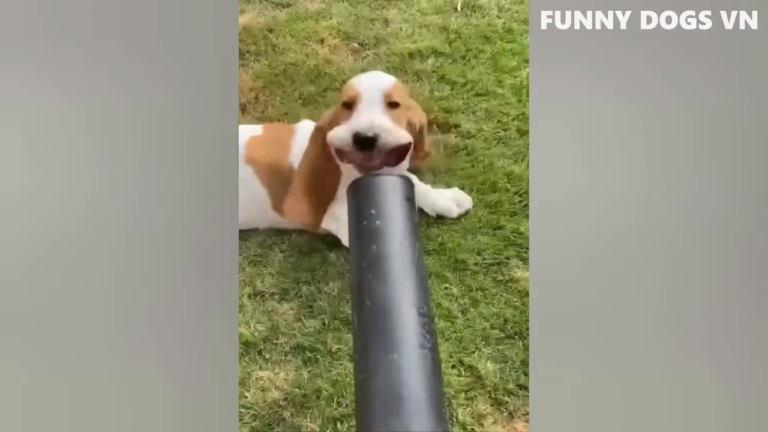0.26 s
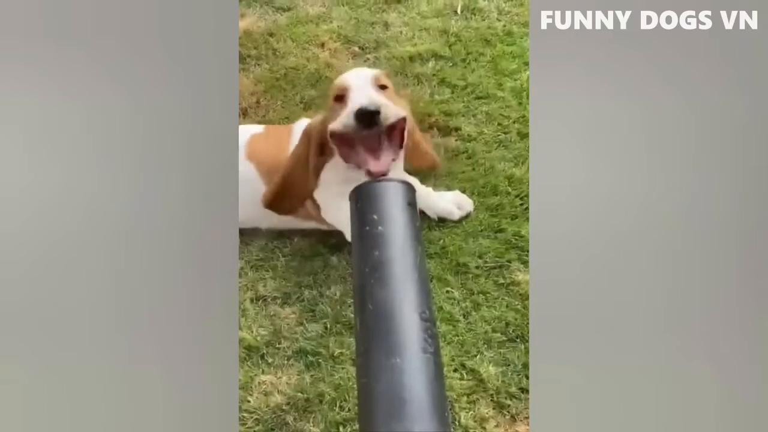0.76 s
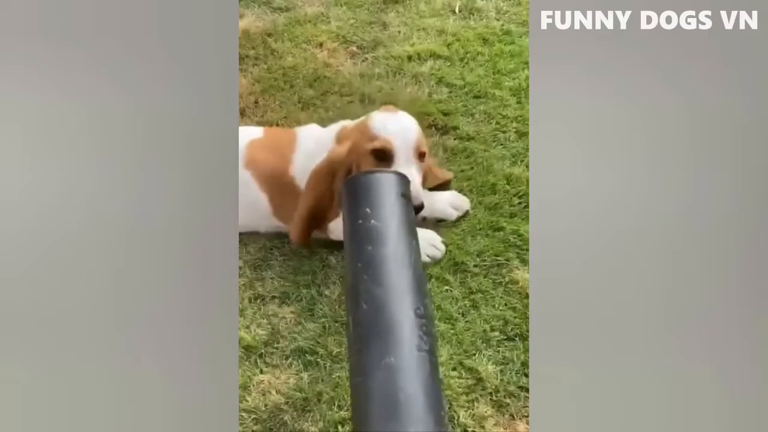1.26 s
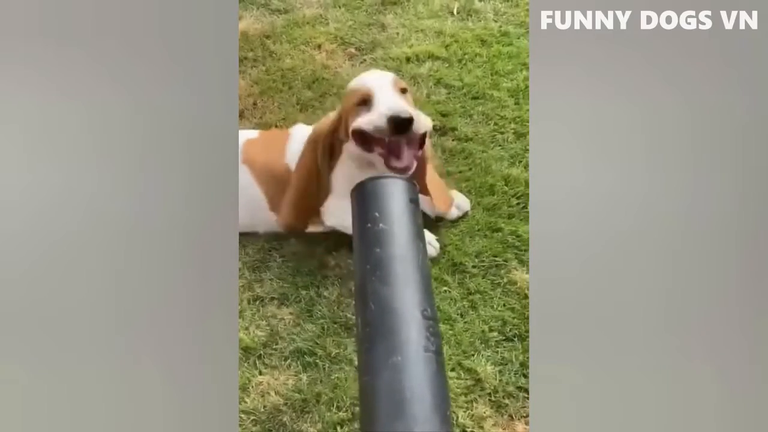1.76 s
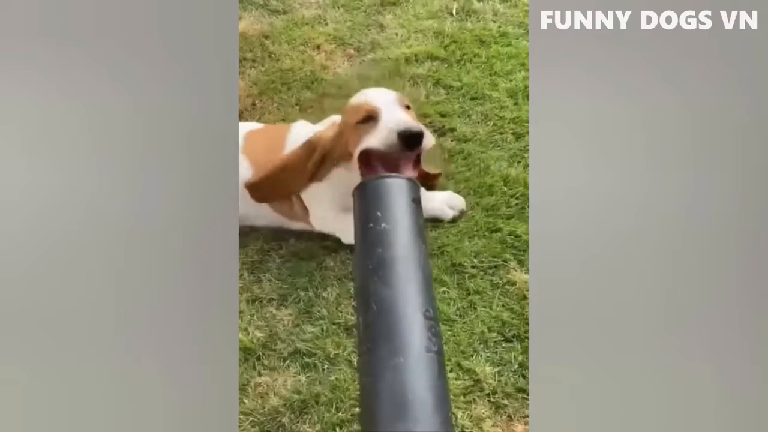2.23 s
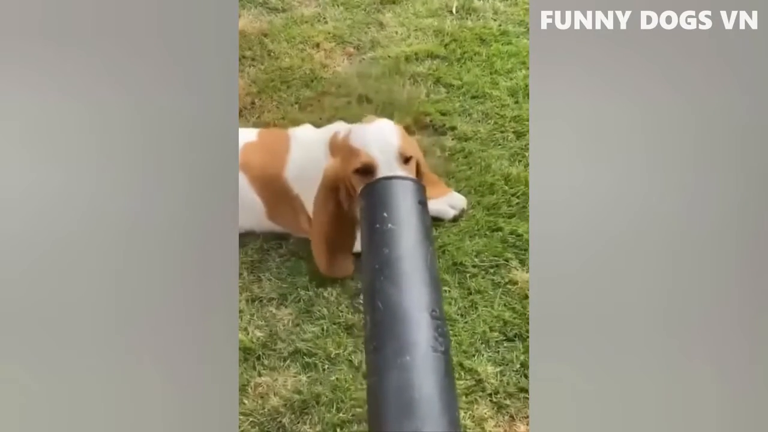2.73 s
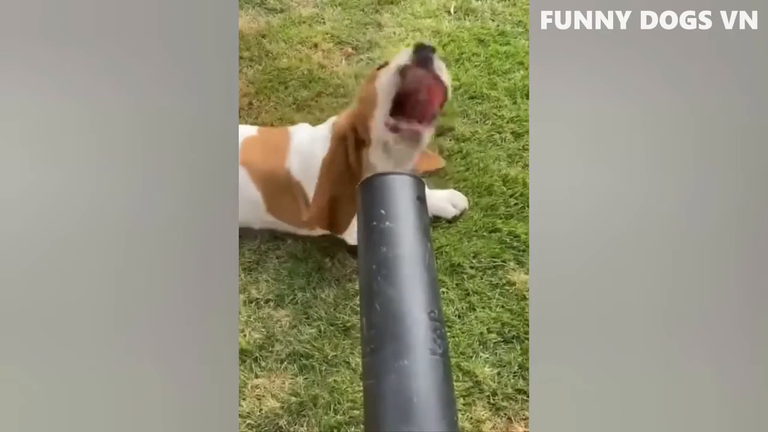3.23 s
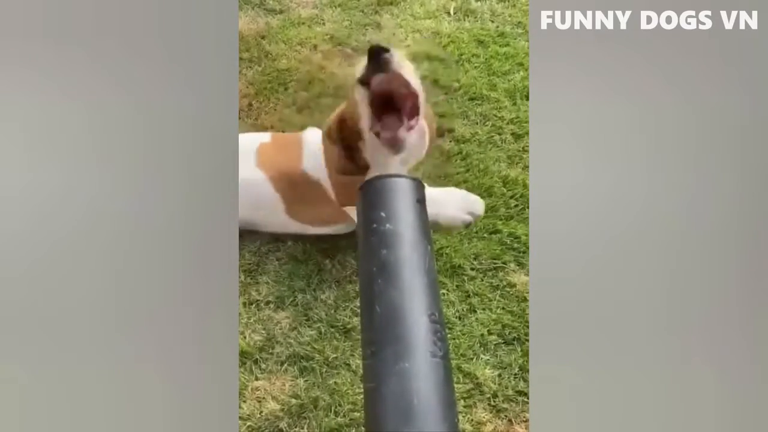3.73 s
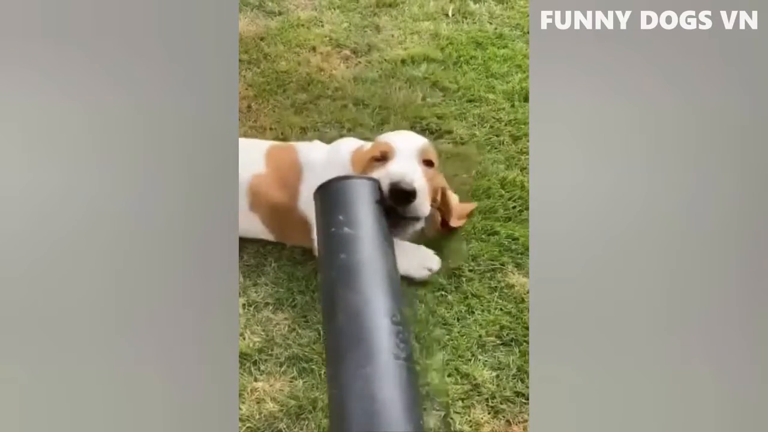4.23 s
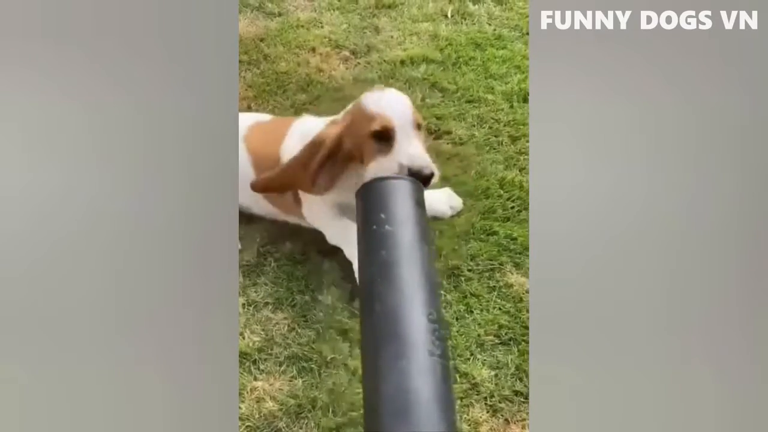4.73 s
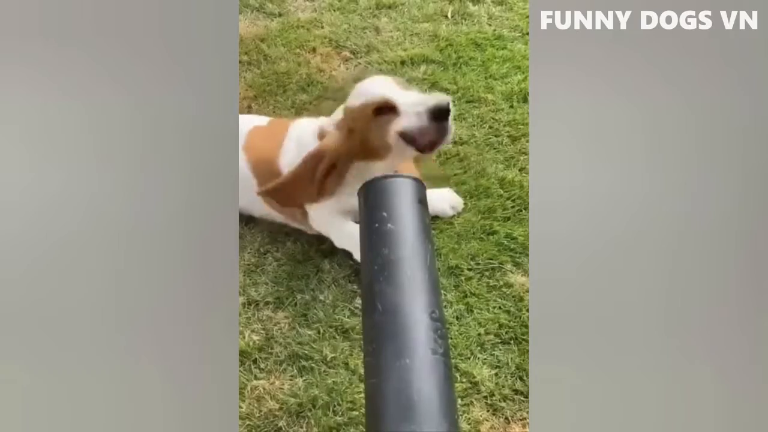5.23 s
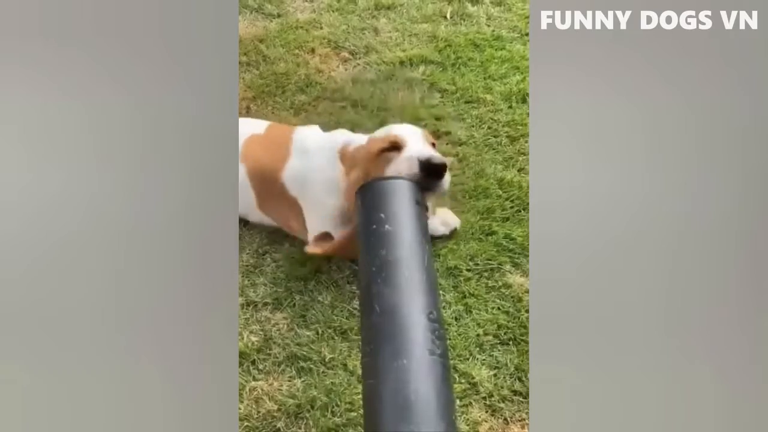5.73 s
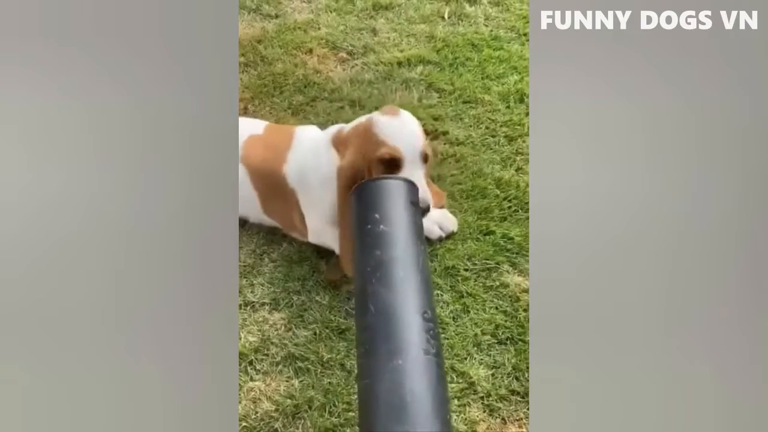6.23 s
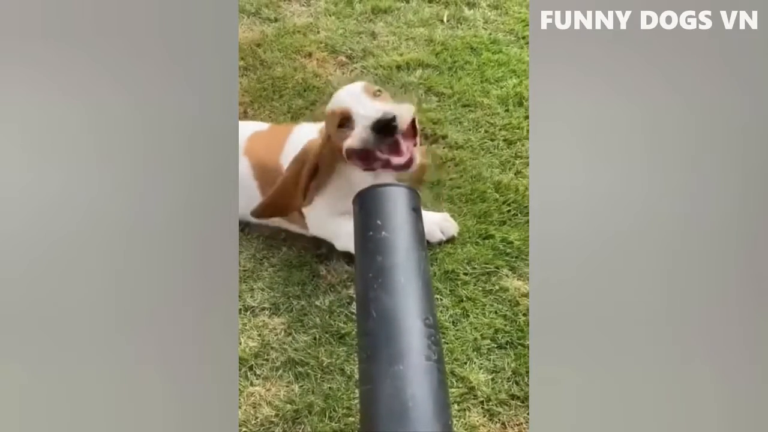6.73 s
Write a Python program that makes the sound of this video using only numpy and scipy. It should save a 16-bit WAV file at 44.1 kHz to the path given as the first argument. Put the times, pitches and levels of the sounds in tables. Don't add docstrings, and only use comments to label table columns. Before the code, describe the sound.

A handheld electric leaf blower whines and rushes air outdoors, droning when its nozzle is blocked, surging, then dipping in pitch as the trigger eases.

```python
import sys
import numpy as np
from scipy import signal
from scipy.fft import rfft, irfft, next_fast_len
from scipy.io import wavfile
from scipy.ndimage import uniform_filter1d

SR = 44100
rng = np.random.default_rng(int(sys.argv[2]) if len(sys.argv) > 2 else 0)


def ratio(d):
    e = np.asarray(d, float) / 20
    return 10 ** e


def generate_wav(sig):
    pcm = np.round(np.clip(np.atleast_2d(sig).T, -1, 1) * 32767).astype(np.int16)
    wavfile.write(sys.argv[1], SR, pcm)


N = 307753
SIZE = next_fast_len(N + 8192)
HZ = np.arange(SIZE // 2 + 1) * SR / SIZE + 1e-3
CRUISE_HZ = 650
COVER_ATTACK_S, COVER_RELEASE_S, FULL_COVER_DB = 0.017, 0.031, -37


def rms_one(x):
    return x / np.sqrt(np.mean(x ** 2) + 1e-20)


def in_time(rows):
    s, *columns = np.transpose(rows)
    return [np.interp(np.arange(N) / SR, s, c) for c in columns]


def drift(rate):
    r = np.exp(-80 * np.pi * rate / SR)
    slow = signal.lfilter([1], [1, -2 * r, r * r], rng.standard_normal(N // 40 + 2002))[2000:]
    return np.interp(np.arange(N) / 40, np.arange(len(slow)), rms_one(slow))


def swell(s, attack_s, hold_s, release_s):
    t = np.arange(N) / SR - s
    fall = np.exp(-np.clip(t - attack_s - hold_s, 0, None) / release_s)
    return np.clip(t / attack_s, 0, 1) * fall


def mode(hz, width):
    return 1 / (1 + 2j * (HZ - hz) / width)


def through(x, response):
    return irfft(rfft(x, SIZE) * response, SIZE)[..., :N]


# pitch_hz, likeness (0-1), right_lead_half_turns (each way, pi radians)
PORT_PAIR = [(40, .92, 0), (150, .997, 0), (300, .985, 0), (500, .85, 0), (900, .45, 0), (1850, .45, .35),
             (2030, .9, .5), (2200, .5, .5), (3700, .1, 0), (4700, .3, .3), (5250, .8, .45),
             (6200, .8, .55), (6900, .3, .75), (7700, .88, .95), (9600, .86, 1.05), (10300, .3, 1.3),
             (11100, .92, 1.46), (12800, .92, 1.54), (13900, .9, 1.95), (17000, .9, 2)]


def at_ports():
    hz, alike, turns = np.transpose(PORT_PAIR)
    alike = np.clip(np.interp(HZ, hz, alike), 0, 1)
    turns = np.interp(HZ, hz, turns)
    shared, *own = rfft(rng.standard_normal((3, SIZE)))
    delay = np.exp(np.pi * 1j * turns * np.array([[-1], [1]]))
    return np.sqrt(alike) * shared * delay + np.sqrt(1 - alike) * np.array(own)


def air(spectrum, level_db, patchy_db, resonance=1):
    hz, db = np.transpose(spectrum)
    noise = at_ports() * ratio(np.interp(np.log(HZ), np.log(hz), db)) * resonance
    out, together = 0, drift(2.1)
    for centre in np.arange(np.log2(hz[0]), np.log2(hz[-1]) + .5, .5):
        share = np.clip(1 - 2 * abs(np.log2(HZ) - centre), 0, 1)
        flicker_db = patchy_db * (0.52 * together + 2.08 * drift(10.0))
        out = out + irfft(noise * share, SIZE)[:, :N] * ratio(flicker_db)
    return ratio(level_db) * rms_one(out)


# start_s, aim_hz (pole rate), response_s
TRIGGER_MOVES = [(0.001, 648.2, 1.2), (0.238, 730.2, 0.097), (0.424, 638.2, 0.103), (0.686, 659.1, 0.071),
                 (1.31, 662.9, 0.02), (1.411, 644.6, 0.151), (2.553, 657.9, 0.115), (2.74, 641.8, 0.091),
                 (2.93, 654.7, 0.043), (3.073, 585.0, 0.576), (3.145, 770.5, 0.086), (3.281, 784.2, 0.346),
                 (3.62, 696.9, 0.069), (3.959, 650.3, 0.044), (4.06, 631.4, 0.14), (4.297, 270.0, 0.34),
                 (4.53, 396.1, 0.05), (4.657, 487.7, 0.069), (4.877, 660.7, 0.064), (5.06, 707.5, 1.2),
                 (5.412, 199.4, 0.359), (6.024, 600.0, 0.095), (6.12, 521.0, 0.03), (6.178, 290.0, 0.28),
                 (6.36, 388.0, 0.04), (6.432, 532.4, 0.102), (6.65, 569.3, 0.225), (6.895, 703.8, 0.053)]


def pole_rate():
    t, out = np.arange(N) / SR, np.full(N, 621.0)
    for s, aim_hz, response_s in TRIGGER_MOVES:
        i = round(s * SR)
        out[i:] = aim_hz + (out[i] - aim_hz) * np.exp(-(t[i:] - t[i]) / response_s)
    return uniform_filter1d(out, round(.02 * SR), mode="nearest")


# multiple (of the pole rate), level_db, speed_db_per_octave, surge_db
STRONG_ORDERS = [(3, 5.5, -5, 1.5), (4, 3.5, 35.5, 3.5), (5, 3.5, 23, 4.5), (7, 16, 32, 8.5)]
# pitch_hz, width_hz, level_db
SHELL_MODES = [(890, 75, -39), (1223, 120, -30.5), (1365, 160, -34.5), (1541, 66, -26.5), (1687, 88, -39.5),
               (1865, 47, -41.5), (2228, 134, -33.5), (2352, 61, -25.5), (2441.5, 65, -23.5),
               (2570.2, 67.7, -24), (2803, 206, -28.5), (3054, 28, -42), (3266, 170, -36.5),
               (3410, 170, -45)]
# time_s, level_db
THIRD_ORDER_LOBE = [(0, -6), (.12, -3), (.23, -3), (.28, -7), (.34, 9), (.4, -2), (.6, -5), (2.4, 10.5),
                    (2.54, 24), (2.62, 4), (3.36, -6), (3.66, -4.5), (3.8, 6), (3.9, 0), (4.26, -1),
                    (4.38, -1), (4.42, -8), (4.48, 3.5), (4.54, 0), (4.621, -9), (4.671, -1.5), (4.8, -5.5),
                    (4.88, -6.5), (5.5, -1), (5.57, -0.5), (5.61, -10), (5.64, -4.5), (5.71, 1),
                    (5.76, -9.5), (5.84, 4.5), (5.88, -19), (5.92, -3), (5.98, -11), (6.119, -13),
                    (6.171, -8), (6.22, -2), (6.48, -6), (6.54, -5), (6.58, 5), (6.66, -3), (6.76, -18),
                    (6.84, -8), (6.98, -6)]
FOURTH_ORDER_LOBE = [(0, -1.5), (.22, 1.5), (.26, 1.5), (.295, 4), (.322, 6.5), (.36, -3), (.41, 7),
                     (.45, -2), (.485, 11), (.522, 3), (0.549, 7), (.66, -1.5), (.84, 3), (1.3, 6),
                     (1.35, -5.5), (1.45, 7.5), (1.6, -1.5), (1.77, -1.5), (2.38, -1.5), (2.52, 0),
                     (2.73, -2), (2.81, -6.5), (3.01, -2.5), (3.13, -5.5), (3.16, 3), (3.19, 9),
                     (3.22, 1.5), (3.26, 5.5), (3.29, -7), (3.34, 5), (3.46, 3), (3.55, -5), (3.63, 3),
                     (3.67, 9), (3.72, 2.5), (3.82, 9), (3.89, 6), (3.97, 2), (4, 3), (4.11, -6),
                     (4.27, -1), (4.31, -2.5), (4.33, -6.5), (4.39, 1), (4.75, -12), (4.89, 2), (4.94, -4),
                     (5.015, 1), (5.05, -3.5), (5.38, 0.5), (5.409, 3), (5.47, -6), (5.6, 13), (6.12, -12),
                     (6.78, 0), (6.9, 0), (6.93, 0), (6.98, 3)]
FIFTH_ORDER_LOBE = [(0, 5), (.22, 7), (.26, -5), (.3, -7), (.4, 6), (.5, -2), (.58, 0), (.9, -2),
                    (.94, -13), (1, 5.5), (1.06, -5), (1.14, 0.5), (1.18, -12), (1.22, 1), (1.82, -3),
                    (1.96, 2.5), (2.38, -0.5), (2.44, 5.5), (2.52, -2), (2.58, 2), (2.64, -14), (2.7, 0),
                    (2.76, -8), (2.92, -6), (3.06, -2.5), (3.9, 3.5), (3.98, -2), (4.1, -6), (4.3, 4),
                    (4.45, -6.5), (4.72, -11), (4.78, -2), (4.85, -3.5), (4.88, 0.5), (4.895, -10),
                    (4.915, 2.5), (4.95, 6), (5, -3.5), (5.2, 1), (5.28, -9), (5.36, -13), (5.42, 3),
                    (5.6, -3.5), (6.12, -7), (6.17, -15), (6.22, 0), (6.3, -9), (6.5, -3.5), (6.58, 2),
                    (6.64, -20), (6.74, -3), (6.78, 0), (6.8, 5), (6.85, -17), (6.909, 10), (6.98, -12)]
SEVENTH_ORDER_LOBE = [(0, 13), (4.5, -3), (4.66, 1.5), (4.9, -9.5), (5.54, -6), (5.6, -3), (5.66, -6),
                      (5.7, 1), (5.86, -13), (6, -9.5), (6.3, 0), (6.4, -2), (6.44, 2.5), (6.48, 0),
                      (6.54, -5), (6.6, -1), (6.66, -3), (6.72, 6), (6.86, 17), (6.9, -6), (6.98, -2)]


def strong_orders(pole_hz, surge):
    grid = np.arange(500, 6000, 5.)
    shell = sum(ratio(2 * db) / (1 + (2 * (grid - hz) / width) ** 2) ** 2 for hz, width, db in SHELL_MODES)
    null_hz, null_width_hz, null_db = 2960, 60, -10
    shell_db = 10 * np.log10(shell) + null_db / (1 + (2 * (grid - null_hz) / null_width_hz) ** 2)
    lobes = (THIRD_ORDER_LOBE, FOURTH_ORDER_LOBE, FIFTH_ORDER_LOBE, SEVENTH_ORDER_LOBE)
    levels = []
    for (k, db, slope_db, surge_db), lobe in zip(STRONG_ORDERS, lobes):
        law_db = db + slope_db * np.log2(pole_hz / CRUISE_HZ) + surge_db * surge
        levels.append(law_db + np.interp(k * pole_hz, grid, shell_db) + in_time(lobe)[0])
    return levels


FAINT_ORDERS = {1: (-41, 665, 130), 2: (-43.5, 930, 280), 2.75: (-40, 1250, 500), 3.25: (-37, 1670, 120),
                3.75: (-47, 2430, 100), 6: (-46.5, 4200, 700), 6.001: (-52, 2500, 250), 8: (-47, 2650, 600),
                9: (-56, 3300, 800)}
# pitch_hz, left_minus_right_db, left_lead_radians
HOUSING_PAN = [(650, 4, .3), (900, 3, 1.3), (1220, .5, 1.5), (1400, -4.5, 1.7), (1530, -5, 1.9),
               (1880, 0, 1.2), (2000, 0, 3), (2250, -3, 1.3), (2500, 0, 1.4), (2600, -4, 1.6),
               (2700, -9.5, 2.2), (2830, -11.5, 2.1), (3040, -.5, 2), (3240, -3.5, 1.6)]


def whine(pole_hz, surge, *strong_db):
    phase = 2 * np.pi * np.cumsum(pole_hz * (1 + 0.0004 * drift(29.0))) / SR
    flutter_db = 1.2 + 2 * np.clip(np.log2(640 / pole_hz), 0, .6)
    lines = sum(ratio(db + .7 * drift(18)) * np.sin(k * phase) for k, db in zip((3, 4, 5, 7), strong_db))
    for k, (db, hz, width) in FAINT_ORDERS.items():
        coasting_db = 14 * np.minimum(surge, 0) * (k % 1 > .1)
        resonance = 1 / (1 + (2 * (k * pole_hz - hz) / width) ** 2)
        lines += ratio(db + coasting_db + 1.6 * flutter_db * drift(23.0)) * resonance * np.sin(k * phase)
    lines[353:] += .3 * lines[:-353]
    hz, pan_db, lead = np.transpose(HOUSING_PAN)
    left_over_right = ratio(np.interp(HZ, hz, pan_db)) * np.exp(1j * np.interp(HZ, hz, lead))
    ports = left_over_right ** np.array([[.5], [-.5]])
    return 2 * through(lines, ports / np.linalg.norm(ports, axis=0) / (1 + (HZ / 4200) ** 8))


SWITCHING_SIDEBANDS = {-4: -49.5, -1: -49, 0: -49.5, 1: -47, 2: -55, 3: -57, 4: -51.5, 8: -66}
# multiple (of the shaft rate), start_s,
# length_s, level_db
SIDEBAND_SWELLS = [(4, .36, .12, 6), (1, .48, .25, 4), (3, 3.18, .18, 8), (1, 3.62, .25, 5), (-1, 4.2, .2, 9),
                   (1, 4.2, .2, 3), (4, 4.24, .16, 5), (0, 4.24, .12, 3), (-1, 4.36, .05, 9), (4, 6.04, .12, 4),
                   (8, 4.62, .14, 10), (1, 4.68, .25, 9), (3, 4.94, .48, 13), (1, 6.06, .1, 12),
                   (4, 6.38, .36, 9), (2, 6.44, .3, 4)]


def switching(pole_hz, hiss_db):
    carrier = 2 * np.pi * 7764 * np.arange(N) / SR
    shaft = np.pi / 2 * np.cumsum(pole_hz) / SR
    slow = np.log2(650 / pole_hz)
    lines = np.zeros(N)
    for k, db in SWITCHING_SIDEBANDS.items():
        swell_db = sum(rise_db * swell(s, .03, length_s, .03) for j, s, length_s, rise_db in SIDEBAND_SWELLS if j == k)
        slow_db = slow * (-10 if k % 2 or k == 0 else 8)
        lines += ratio(db + swell_db + 3.5 * drift(5) + slow_db) * np.sin(carrier + k * shaft)
    braking = -uniform_filter1d(np.gradient(pole_hz) * SR, size=2000)
    coasting = np.clip(braking / 400, 0, 1) ** 2 * np.clip((600 - pole_hz) / 80, 0, 1)
    lines = lines * ratio(-16 * coasting) * ratio(0.74 * (hiss_db + 41))
    return np.array([np.roll(lines, 6), lines])


# pitch_hz, density_db (per Hz)
LOW_RUSH = [(60, -11.5), (130, -3.5), (250, -3.5), (600, -4.5), (1000, -2), (1300, -8), (1700, -23.5)]
MIDDLE_RUSH = [(800, -43.5), (1200, 3), (1550, 13), (2000, 9.5), (2900, 7), (3700, 1), (5000, -0.5),
               (5900, 1.5), (6500, -1.5), (7500, -23)]
HIGH_HISS = [(5000, -46), (6500, -7.5), (7500, -6), (9000, -5), (10500, -7), (12000, -7.5), (13200, -15.5),
             (15600, -14), (15900, -50)]
# pitch_hz, width_hz, boost_db
OPEN_TUBE = [(229, 29, 8), (449, 36, 6.5), (659, 260, 4.5), (826.3, 10.8, 11.5), (1026, 29, 0),
             (1354, 32, 9), (1385, 36, 2.5), (1995, 29, -27)]


def rush(low_db, middle_db, hiss_db):
    tube = ratio(sum(db * abs(mode(hz, width)) ** 2 for hz, width, db in OPEN_TUBE))
    low = air(LOW_RUSH, low_db, 1.11, tube)
    middle = air(MIDDLE_RUSH, middle_db, 1.07, tube)
    return low + middle + air(HIGH_HISS, hiss_db, 0.85)


# pitch_hz, density_db (per Hz)
FAR_SPECTRUM = [(25, 3), (45, 8), (70, 17.5), (120, -28), (300, -4), (900, -40), (2000, -32)]


def far_rumble():
    return air(FAR_SPECTRUM, -57.0, 0.73)


# start_s, length_s, drone_db
MUZZLE_COVERS = [
    (-.05, 0.062, -26),
    (2.616, 0.464, -24),
    (6.047, 0.17, -32),
    (6.568, 0.027, -49),
]


def muzzle_cover():
    return sum(ratio(db) * swell(s, COVER_ATTACK_S, length_s, COVER_RELEASE_S) for s, length_s, db in MUZZLE_COVERS)


# pitch_hz, width_hz, level_db
COVERED_TUBE = [(208.8, 50, 1.5), (268, 43, -3.5), (428, 39, -8), (498, 100, -13.5), (1035, 25, -5.5),
                (1585, 120, -3), (1830, 470, -13.5)]


def drone(level_db, cover):
    body = sum(ratio(db) * abs(mode(hz, width)) ** 1.64 for hz, width, db in COVERED_TUBE)
    body = body / (1 + (120 / HZ) ** 4)
    leak = np.clip(1 - uniform_filter1d(cover, size=3000) / 2.8, 0, 1)
    eddies = irfft(at_ports() * body, SIZE)[:, :N]
    cover = np.clip(cover, 0, 1)
    flap = np.sin(2 * np.pi * np.cumsum(28 * (1 + .2 * drift(6))) / SR)
    hum_hz = 210 * (1 + .04 * drift(8) + .45 * leak)
    phase = 2 * np.pi * np.cumsum(hum_hz) / SR
    hum = np.sqrt(2) * (np.cos(phase) + ratio(-10) * np.cos(2 * phase))
    return ratio(level_db + 3 * cover * flap) * (rms_one(eddies) + .5 * cover * hum)


# start_s, length_s, level_db
EDGE_GAPS = [
    (-.02, 0.07, -29.5),
    (2.576, .04, -31.5),
    (3.07, 0.056, -29),
    (4.316, 0.081, -36.5),
    (6.55, 0.23, -41.5),
]


def whistle():
    noise = irfft(at_ports() * abs(mode(1068, 44)) ** 2, SIZE)[:, :N]
    gain = sum(ratio(db) * swell(s, COVER_ATTACK_S, length_s, COVER_RELEASE_S) for s, length_s, db in EDGE_GAPS)
    return gain * rms_one(noise)


# start_s, peak_db, pitch_hz
JAW_SNAPS = [
    (5.9496, -17, 500),
    (5.9545, -26, 300),
]


def snap():
    out = np.zeros(N)
    for s, peak_db, hz in JAW_SNAPS:
        t = np.arange(1200) / SR
        grit = signal.lfilter([1], [.6, -.45], rng.standard_normal(1200))
        tick = ratio(-19) * grit * (np.exp(-t / .0015) + .3 * np.exp(-abs(t - .008) / .003))
        knock = np.cos(2 * np.pi * hz * (t - .0045)) * np.exp(-((t - .0043) / .0026) ** 2)
        start = round(s * SR)
        out[start:start + 1200] += ratio(peak_db) * (tick + knock)
    return np.array([np.roll(out, 4), out])


def rasp():
    noise = irfft(at_ports() * abs(mode(2860, 910)) ** 2.6, SIZE)[:, :N]
    return ratio(-29.5) * swell(6.008, 0.04, 0.03, 0.025) * rms_one(noise)


# time_s, level_db
JET_AIM = [(0, -1), (.4, 1), (.7, 0), (1.1, .5), (1.7, -0.5), (2.5, 1.5), (3.2, -2), (3.6, -2), (4.2, -1.5),
           (4.55, 2.5), (5, -0.35), (5.4, 1), (5.9, 1.5), (6.15, 1.5), (6.4, 1.5), (6.98, 0)]


def scene():
    pole_hz = pole_rate()
    covered = muzzle_cover()
    cover = covered / ratio(FULL_COVER_DB)
    acceleration = uniform_filter1d(np.gradient(pole_hz) * SR, round(.08 * SR))
    surge = np.tanh(acceleration / 800)
    controls = np.array([np.ones(N), np.log2(pole_hz / CRUISE_HZ), surge, cover, in_time(JET_AIM)[0]])
    low = (-33.5, 9, 2, 1, 1.15)
    middle = (-30, 17, 1.5, 0, 1.26)
    high = (-37.5, 19.5, 1, -0.5, 1.4)
    open_drone = (-39.5, 11.5, -2.5, -4, 0)
    low_db, middle_db, hiss_db, open_db = np.array([low, middle, high, open_drone]) @ controls
    motor = whine(pole_hz, surge, *strong_orders(pole_hz, surge)) + switching(pole_hz, hiss_db - 7.0)
    jet = rush(low_db, middle_db, hiss_db) + far_rumble()
    drone_db = 20 * np.log10(ratio(open_db) + covered)
    return motor + jet + drone(drone_db, cover) + whistle() + snap() + rasp()


def roll_off(x):
    return signal.sosfilt(signal.butter(12, 16810, fs=SR, output="sos"), x)


def record(dry):
    return roll_off(dry)


dry = scene()
out = record(dry)
generate_wav(out)
```